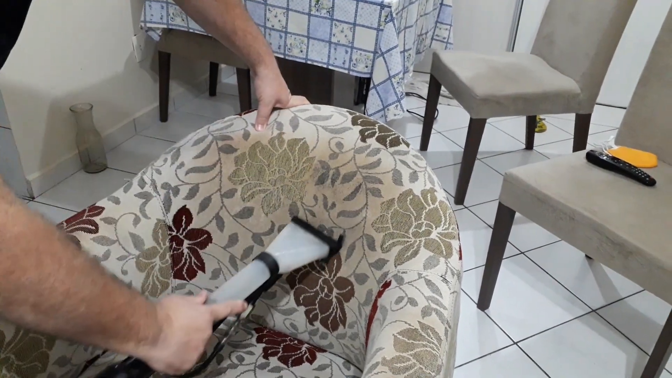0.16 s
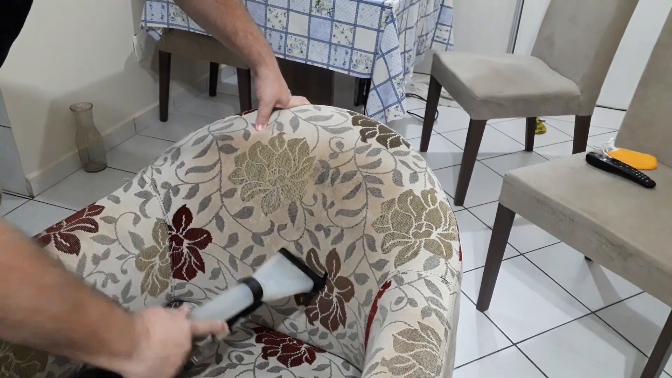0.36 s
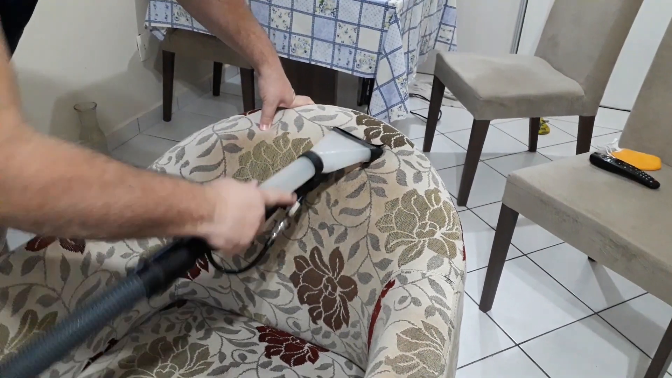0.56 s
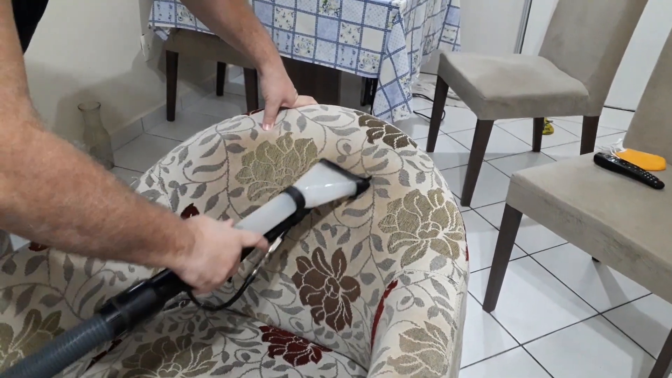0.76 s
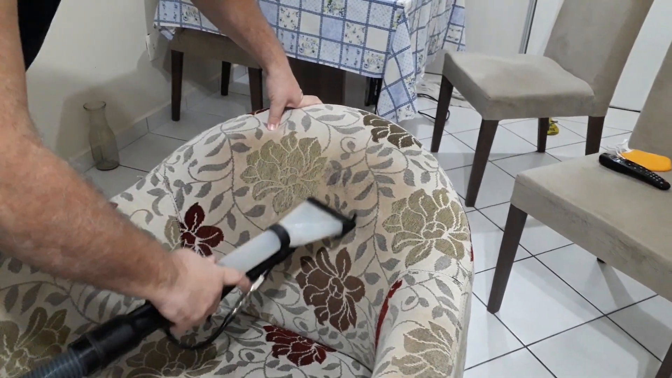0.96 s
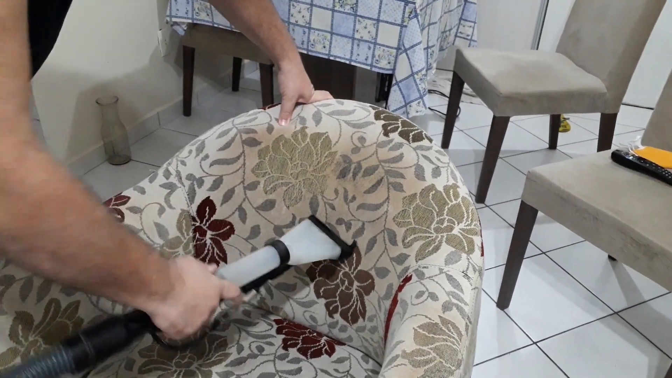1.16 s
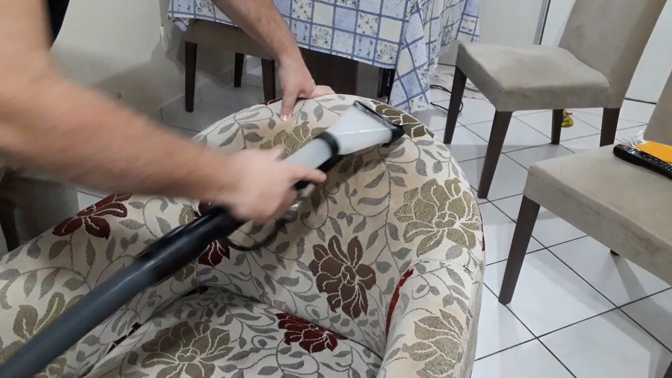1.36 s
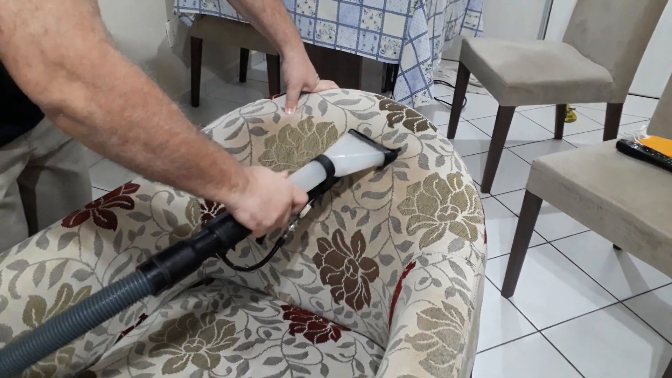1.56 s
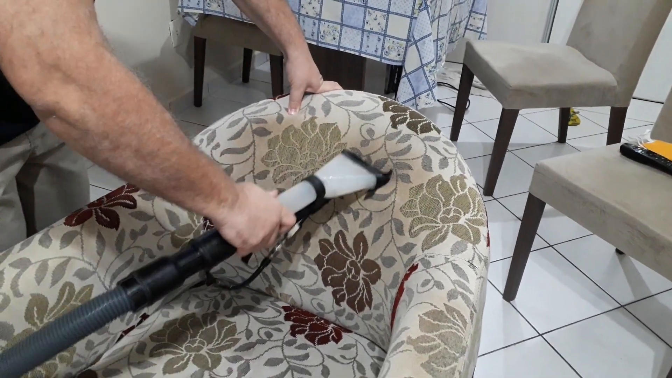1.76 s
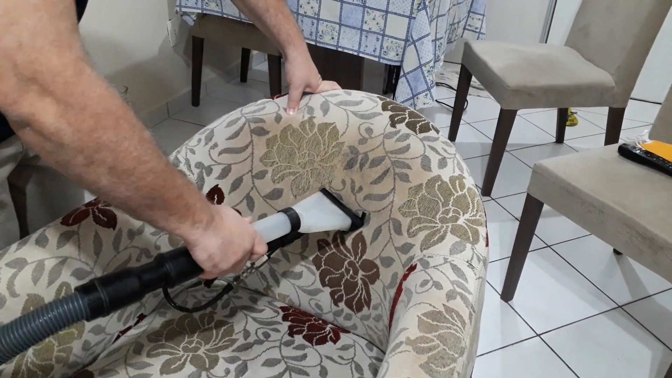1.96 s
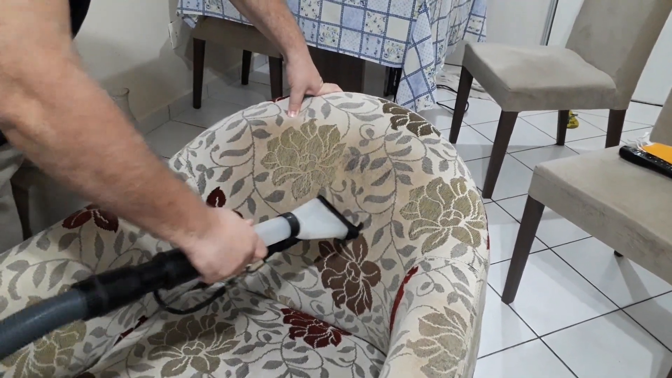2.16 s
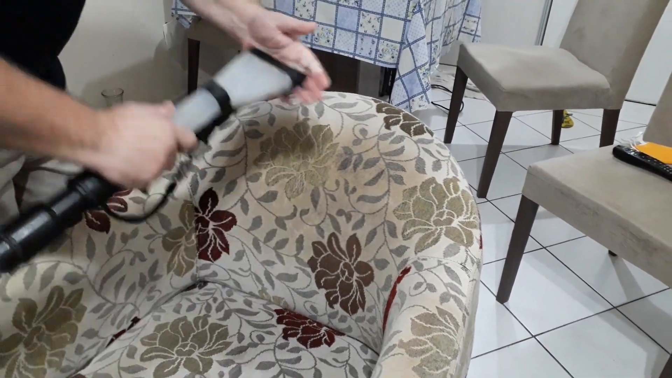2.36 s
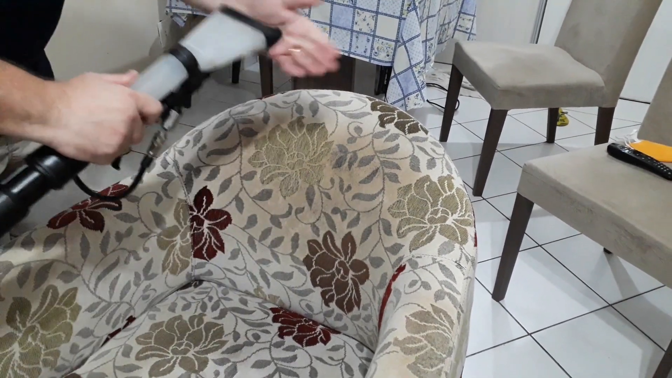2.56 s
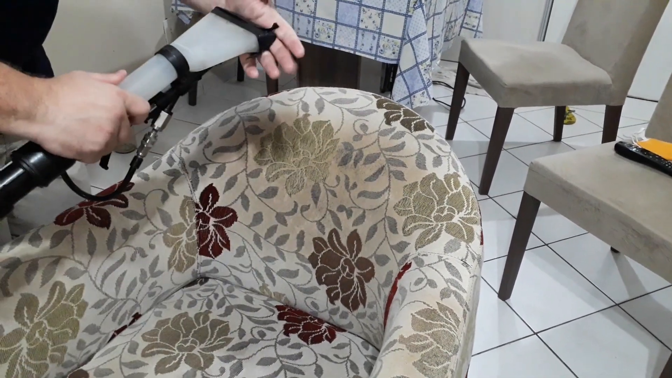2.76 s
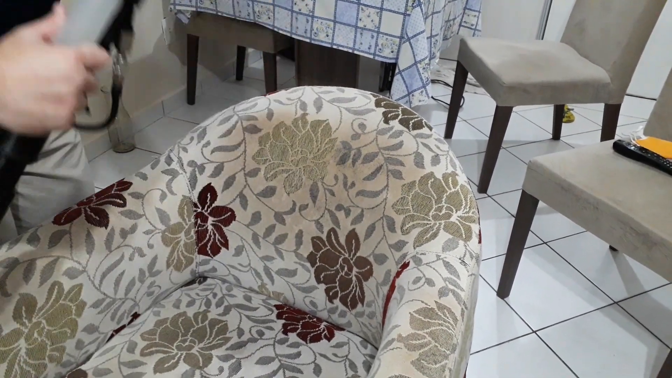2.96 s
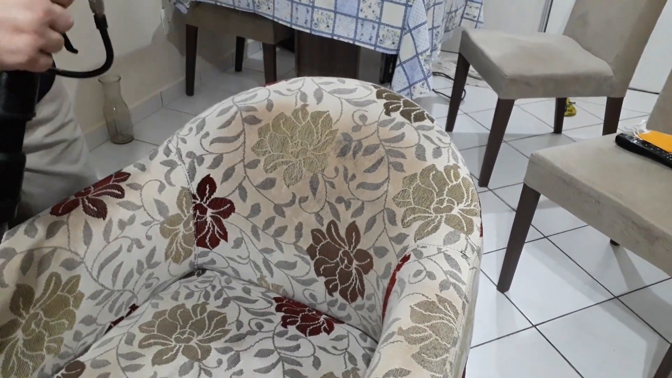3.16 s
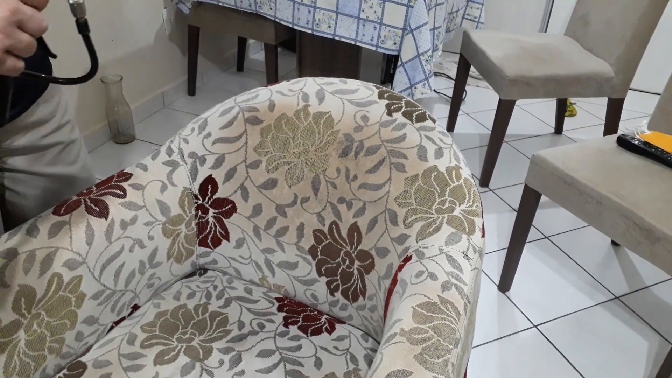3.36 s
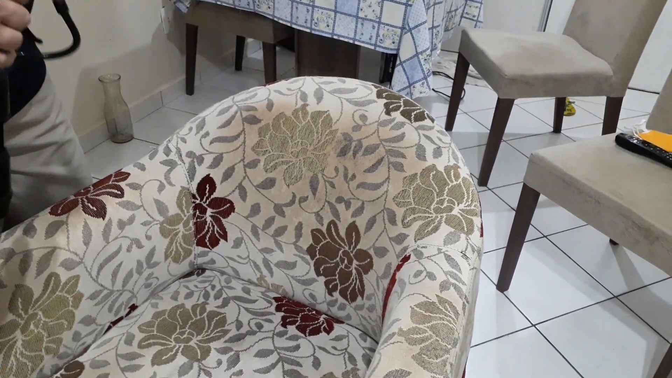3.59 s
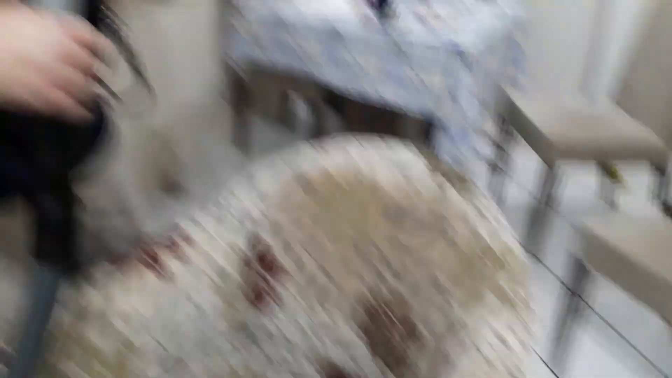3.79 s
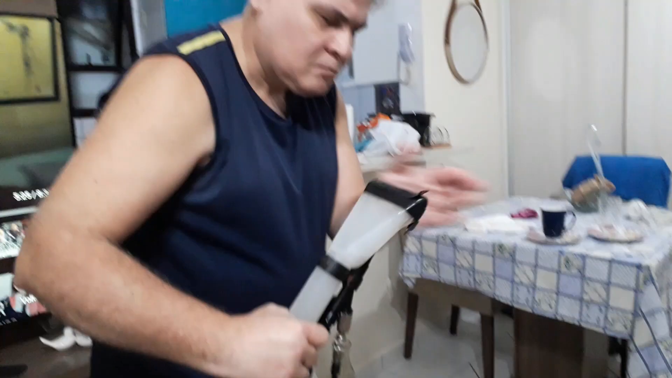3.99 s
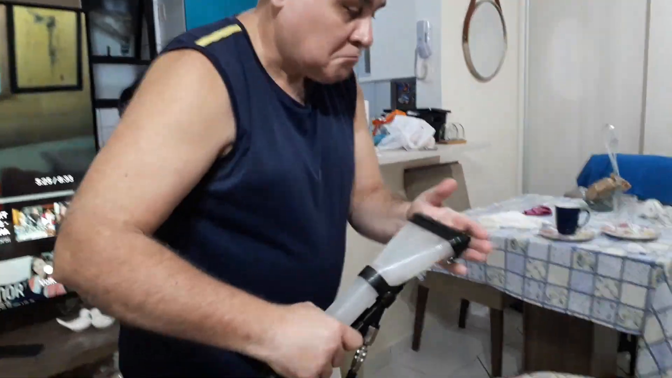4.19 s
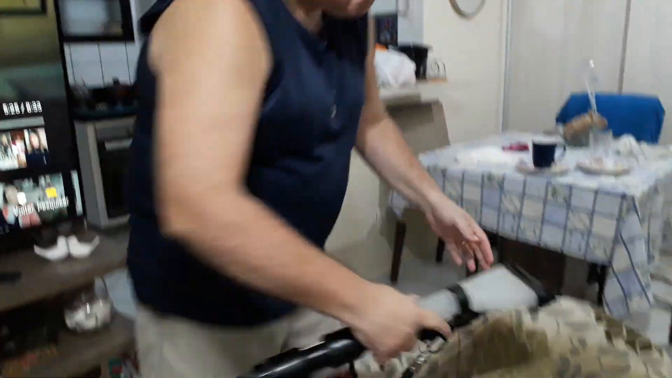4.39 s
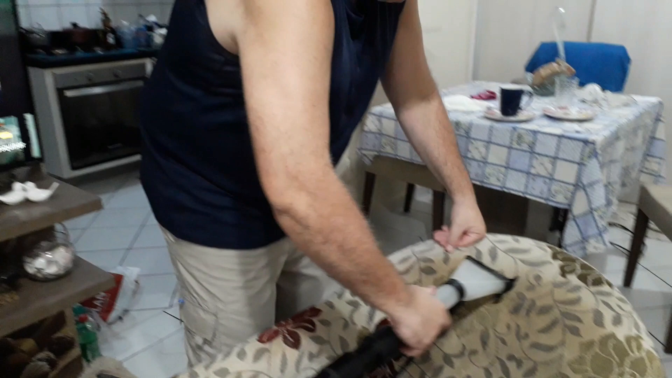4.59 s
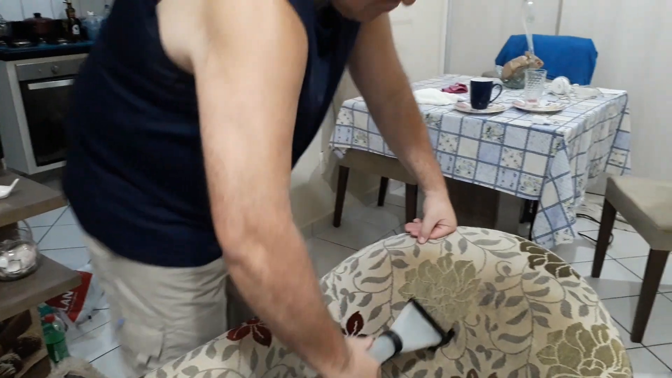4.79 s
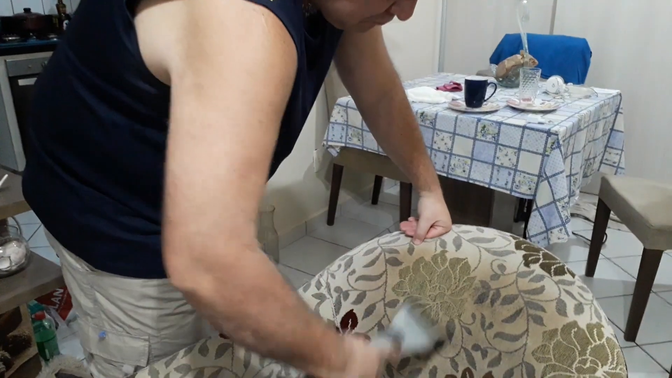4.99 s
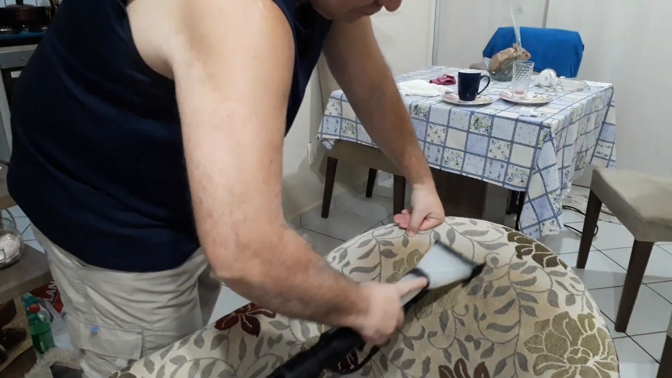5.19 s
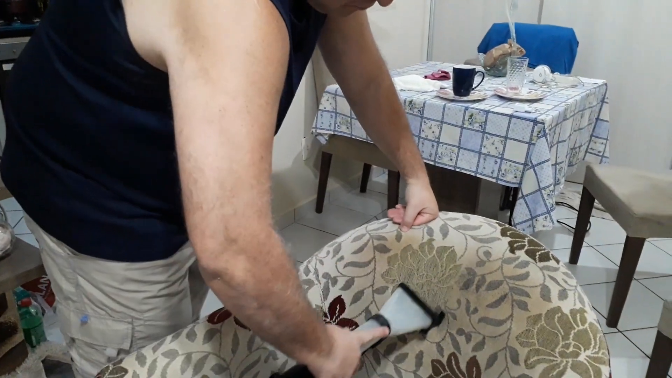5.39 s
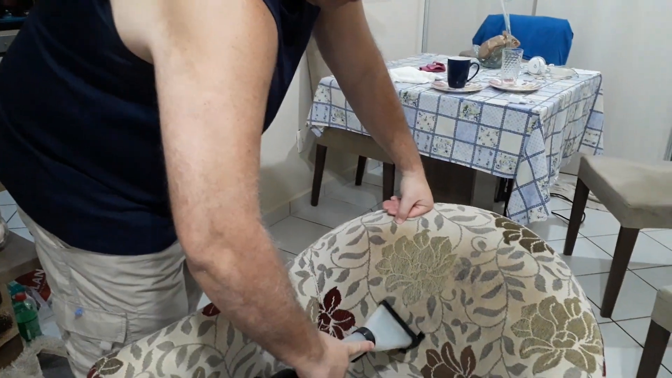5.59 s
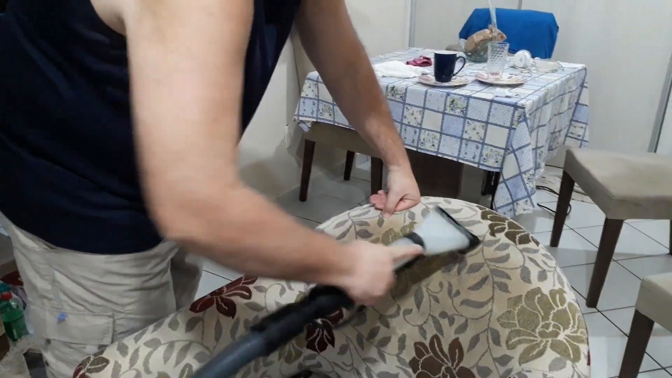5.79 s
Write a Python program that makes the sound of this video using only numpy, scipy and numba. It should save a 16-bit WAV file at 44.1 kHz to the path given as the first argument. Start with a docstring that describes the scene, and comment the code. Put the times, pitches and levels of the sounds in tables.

```python
"""Upholstery extractor on a damp armchair

A turbine, modelled as rotational orders of its shaft, speeds up whenever its air slot is choked.
Filtered noise makes the rush in the hose and the wet hiss and resonances at the slot.
Twice the nozzle is lifted and wiped with a hand: gliding noise bands squeal and slurp in the gap,
and once the palm pops off as decaying sines. Drops tick, cloth scuffs, and a tiled room prolongs the air.
All the air noise dips briefly 29 times a second."""
import sys
import numpy as np
from scipy import signal
from scipy.fft import rfft, irfft
from scipy.io import wavfile
from numba import njit

SR = 44100
rng = np.random.default_rng(int(sys.argv[2]) if len(sys.argv) > 2 else 0)


def log_audio(samples):
    """Write samples as a 16-bit WAV file to the path given in sys.argv[1]."""
    # one column per channel
    frames = np.atleast_2d(samples).T
    # limit to full scale, then quantise
    limited = np.clip(frames, -1, 1)
    pcm = np.round(limited * 32767).astype(np.int16)
    wavfile.write(sys.argv[1], SR, pcm)


N = 257544
T = np.arange(N) / SR  # s

# Slot covered by fabric, or the fourth and fifth time by the hand: start_s, end_s, gained_speed_hz,
# hiss_db, bite_db, whine_db, drone_db (all changes from the open slot)
SEALS = [(-.2, .41, 4.4, 4.5, 2.2, 1.5, 7.5), (0.598, 1.221, 7.9, 5, 3.5, 3, 6.5),
         (1.467, 2.24, 9.1, 3, 4, -2.5, 4), (2.381, 2.83, 6.8, 1, -0.5, -3, 1.5),
         (3.75, 4.2, 1.8, 0.5, 1.5, -2, 5), (4.6, 5.03, 7.66, 3, 3, 1.5, 10.5),
         (5.185, 5.71, 9.1, 4, 4.5, 1.5, 6.5)]
# Loudness course of the machine, scaled within each source: time_s, level_db
LOUDNESS = [(0, -0.44), (2.36, 0.45), (2.55, -2.8), (2.75, -10.5), (3.08, -9.2), (3.3, -5.5), (3.5, -0.0),
            (3.82, 1.6), (4.05, -2.5), (4.35, -6.5), (4.68, -7.5), (5.05, 0.0), (5.84, -0.76)]
# Spectral shape of air rushing in the hose: frequency_hz, relative_density_db (per Hz)
RUSH_SPECTRUM = [(25, -17), (60, -24), (110, -13), (147, -5), (190, -12), (270, -5.5), (350, 1),
                 (450, -3.5), (600, -4.5), (790, 2.5), (1400, -0.5), (2500, -1), (5000, -1), (16000, -26.5)]
# Spectral shape of hiss at the slot: frequency_hz, relative_density_db (per Hz)
HISS_SPECTRUM = [(800, -20), (2500, -17), (4500, -7.5), (6300, .5), (7600, 0.5), (9000, 0.5), (9850, 3),
                 (10900, -2), (12200, -1.5), (13600, -9), (16000, -6)]
# Air modes of the nozzle head: frequency_hz, nominal_width_hz, relative_level_db, extra_growth_db_per_db
NOZZLE_MODES = [(3320, 520, -0.5, -0.5), (3750, 370, -8, -1), (4090, 510, -2, -0.5), (4560, 400, -1, 1.2),
                (5950, 800, -10, 3.5)]
# Air squeezing between hand and slot: start_s, length_s, relative_level_db, swell_db, tight_hz, open_hz,
# nominal_breadth (share of the mean pitch)
SLURPS = [(2.36, 0.033, -21, 0, 7450, 8930, .8), (2.421, .033, -12.5, -.5, 6140, 6800, 0.18),
          (2.416, 0.092, -17, 0, 10350, 9900, .33), (2.511, 0.039, -13, 0.5, 10500, 3900, 0.35),
          (2.672, 0.14, -28, 5.5, 10300, 3570, 0.62), (3.875, 0.112, -14, 2, 10650, 3360, 0.43),
          (4.089, 0.026, -12, -1, 6510, 4200, 0.78), (4.174, 0.018, -17.5, 3, 5800, 6930, 1.5),
          (4.203, 0.015, -15, 3, 4870, 2990, 1.1)]
# Palm breaking the seal: start_s, amplitude_db (before decay), ring_hz, decay_s
POPS = [(2.537, -5.5, 412, 0.0018), (2.5402, -9, 120, 0.0056), (2.5405, -3.5, 990, 0.0016),
        (2.5411, -6, 1950, 0.0011)]
# Water drops striking the nozzle wall: start_s, peak_db, resonance_hz
DROPS = [(1.396, -16, 5000), (1.728, -11, 5500), (1.733, -10, 4520), (1.763, -11, 4940), (2.387, -2, 8000),
         (3.876, 1, 7000), (4.18, -9, 3470)]
# Nozzle scuffing the padding as it is set down: centre_s, level_db, half_length_s
SCUFFS = [(0.544, -31, .04), (1.408, -26, 0.019), (2.354, -35, 0.041), (5.112, -32.5, 0.036)]
# Spectral shape of rubbing cloth: frequency_hz, relative_density_db (per Hz)
SCUFF_SPECTRUM = [(30, -16), (80, -5), (150, 1), (300, 5), (800, 4), (1600, -3), (5000, -30)]

FREE_HZ, WANDER_HZ = 325.1, .35  # shaft speed with the slot open, and its unsteadiness
WHINE_DB, WHINE_DB_PER_HZ = -28.5, 0.8152  # at free speed; rise with the speed gained
HUM_DB, HUM_DB_PER_HZ = -50.5, 2.26
DRONE_DB = -37.8
SIXTH_DB, SIXTH_HUM_SHARE = -2.5, 0.62  # the sixth order follows the hum by this share, the drone by the rest
DUCT_HZ, DUCT_HALF_WIDTH_HZ, DUCT_DB = 3992, 3.1, 4  # resonance through which the whine passes
CHOKE_S, VENT_S = .36, .19  # the suction builds behind a seal and leaks away after it
SEAT_S, UNSEAT_S = .11, .28  # the lips of the slot seat and leave
RUSH_DB, RUSH_DB_PER_HZ = -20.5, -0.2531  # with the slot open; a choked hose carries less air
HISS_DB, SLOT_DB = -23.5, -27.6
SLOT_BRIGHT_DB = -25  # the upper slot modes take over above this level
BITE_AT, BITE_SPAN = .29, 0.32  # the nozzle bites hardest early (shares of the stroke)
HISS_AT, HISS_SPAN = 0.39, 0.44  # the wet hiss swells later and lasts longer (shares of the stroke)
GULP_AFTER_S, GULP_HALF_S, GULP_DB_PER_HZ = 0.079, 0.07, 0.2666  # per Hz of speed gained
GAP_OPENING = 7.5  # the gap holds tight and gives way late: power of the elapsed share
DIP_RATE_HZ = 29.25
TOP_HZ = 15800


def turbine(loud_db, gained_hz, seal_whine_db, seal_drone_db):
    """Rotational orders: twelve blades whine above the shaft hum and its fifth and sixth orders."""
    shaft_hz = FREE_HZ + gained_hz + WANDER_HZ * walk(7.8)
    blade_hz = 12 * shaft_hz
    duct_db = DUCT_DB / (1 + ((blade_hz - DUCT_HZ) / DUCT_HALF_WIDTH_HZ) ** 2)
    whine_db = WHINE_DB + .7 * loud_db + WHINE_DB_PER_HZ * gained_hz + seal_whine_db + duct_db
    hum_db = HUM_DB + 0.98 * loud_db + HUM_DB_PER_HZ * gained_hz
    drone_db = DRONE_DB + 0.84 * loud_db + seal_drone_db
    sixth_db = SIXTH_DB + drone_db + SIXTH_HUM_SHARE * (hum_db - drone_db)

    turn = 2 * np.pi * np.cumsum(shaft_hz) / SR
    whine = undb(whine_db) * tone(12 * turn, rough=0.045, width_hz=28)
    # a wholly shaken copy widens the line into a noisy skirt
    skirt = undb(whine_db - 14.0) * tone(12 * turn, rough=1.0, width_hz=150)
    hum = undb(hum_db) * tone(turn, rough=0.14, width_hz=69)
    drone = undb(drone_db) * tone(5 * turn, rough=0.07, width_hz=43)
    sixth = undb(sixth_db) * tone(6 * turn, rough=0.18, width_hz=20)
    # the casing booms near the shaft speed, along with the drone
    casing = unit(bandpass(rng.standard_normal(N), np.full(N, 360.), 62.0))
    boom = casing * undb(0.7 * drone_db - 16)
    return whine + skirt + hum + drone + sixth + boom


def suction():
    """Flow restriction: a choked turbine gains speed and alters its whine; seated lips add drone."""
    gained_hz = whine_db = drone_db = 0
    for start, end, hz, _, _, whine, drone in SEALS:
        choke = grip(start, end, CHOKE_S, VENT_S)
        gained_hz = gained_hz + hz * choke
        whine_db = whine_db + whine * choke
        drone_db = drone_db + drone * grip(start, end, SEAT_S, UNSEAT_S)
    return gained_hz, whine_db, drone_db


def tone(phase, rough, width_hz):
    """Turbulent modulation: a line of rms 1, shaken in level and phase; rough is the shaken share."""
    rough = np.clip(rough, 0, 1)
    steady = np.sqrt(2 * (1 - rough))
    shake = np.sqrt(rough) * (walk(width_hz) + 1j * walk(width_hz))
    return np.real((steady + shake) * np.exp(1j * phase))


def airflow(loud_db, gained_hz):
    """Turbulent flow noise: air roars in the hose, hisses with spray and excites the slot modes."""
    bite_db, wet_db, gulp_db = contact()
    rush_db = RUSH_DB + loud_db + RUSH_DB_PER_HZ * gained_hz + gulp_db
    hiss_db = HISS_DB + 1.02 * loud_db + wet_db
    slot_db = SLOT_DB + 0.68 * loud_db + bite_db
    rush = colour(rng.standard_normal(N), RUSH_SPECTRUM) * undb(rush_db + .5 * walk(14))
    wet_noise = rng.standard_normal(N) + undb(-9.5) * spray(per_s=2800, spread_db=3.5)
    hiss = colour(wet_noise, HISS_SPECTRUM) * undb(hiss_db)
    ring = 0
    for hz, width_hz, db, growth in NOZZLE_MODES:
        # the seal keeps shifting, so each mode wanders a little
        centre_hz = hz * (1 + 0.025 * walk(7.9))
        jet = rng.standard_normal(N) + undb(-9) * spray(per_s=610, spread_db=3.0)
        mode = resonate(jet, centre_hz, 1.6 * width_hz)
        mode_db = slot_db + db + (0.97 + growth) * (slot_db - SLOT_BRIGHT_DB)
        ring = ring + mode * undb(mode_db)
    return rush + (hiss + ring) * undb(0.31 * walk(30))


def contact():
    """Varying aperture: in each stroke the slot bites, wet hiss swells, and air gulps in at release."""
    bite_db = wet_db = gulp_db = 0
    for start, end, hz, hiss, bite, _, _ in SEALS:
        share = (T - start) / (end - start)
        bite_db = bite_db + bite * bell((share - BITE_AT) / BITE_SPAN)
        wet_db = wet_db + hiss * bell((share - HISS_AT) / HISS_SPAN)
        gulp_db = gulp_db + GULP_DB_PER_HZ * hz * bell((T - end - GULP_AFTER_S) / GULP_HALF_S)
    return bite_db, wet_db, gulp_db


def spray(per_s, spread_db):
    """Random impulses: droplets torn from the fabric click densely, a few much larger than the rest."""
    hit = rng.random(N) < per_s / SR
    size = undb(spread_db * np.minimum(rng.exponential(size=N), 4))
    return unit(hit * size * rng.choice([-1, 1], N))


def slurps(edge_s, release_s, rough_db, leak_db, head_hz, head_width_hz, head_db):
    """Jet resonance: the gap under the hand sings a gliding band, amid leaking hiss and a ringing head."""
    out = np.zeros(N)
    ragged = undb(rough_db * walk(400))
    head = resonate(rng.standard_normal(N), np.full(N, 1. * head_hz), 1. * head_width_hz)
    leak = colour(rng.standard_normal(N), HISS_SPECTRUM)
    around = undb(leak_db) * leak + undb(head_db) * head
    for s, length, db, swell_db, tight_hz, open_hz, breadth in SLURPS:
        t = T[:int((length + .06) * SR)]
        here = int(s * SR) + np.arange(len(t))
        share = np.minimum(t / length, 1)
        glide_hz = tight_hz * (open_hz / tight_hz) ** (share ** GAP_OPENING)
        pitch_hz = np.minimum(glide_hz, SR / 3)
        width_hz = 1.8 * breadth * np.sqrt(tight_hz * open_hz)
        jet = rng.standard_normal(SR // 2)[:len(t)]
        sung = resonate(jet, pitch_hz, width_hz)
        gate = (1 - np.exp(-t / edge_s)) * np.exp(-np.maximum(t - length, 0) / release_s)
        add(out, s, undb(db + swell_db * share) * gate * ragged[here] * (sung + around[here]))
    return out


def knocks():
    """Impulse response: drops tick on the plastic; the palm releases a damped pop of the air column."""
    out, t = np.zeros(N), T[:SR // 20]
    for s, db, hz in DROPS:
        strike = rng.standard_normal(len(t)) * np.exp(-t / 0.00049)
        tick = bandpass(strike, np.full(len(t), 1. * hz), 6000.)
        add(out, s, undb(db) * tick / np.abs(tick).max())
    for s, db, hz, decay_s in POPS:
        add(out, s, undb(db) * np.sin(2 * np.pi * hz * t) * np.exp(-t / decay_s))
    return out


def scuffs():
    """Friction noise: rubbing cloth gives dull swells."""
    press = sum(undb(db) * bell((T - s) / half_s) for s, db, half_s in SCUFFS)
    return press * colour(rng.standard_normal(N), SCUFF_SPECTRUM)


def periodic_dips(depth_db, width, offset):
    """Amplitude modulation: a brief dip once a period; width and offset are shares of the period."""
    place = (DIP_RATE_HZ * T + offset + .5) % 1 - .5
    return undb(-depth_db * bell(place / width))


def room(x, t60, wet_db):
    """Diffuse reverberation: tiles and walls return a short, exponentially decaying noise tail."""
    t = T[:SR // 2]
    tail = rng.standard_normal(len(t)) * np.exp(-np.log(1000) * t / t60) * (t > .004)
    return x + undb(wet_db) * signal.fftconvolve(x, tail / np.linalg.norm(tail))[:N]


@njit
def bandpass(x, hz, width):
    """Second-order resonance: a state-variable filter whose centre moves every sample."""
    y, band, low = np.empty(len(x)), 0., 0.
    for i in range(len(x)):
        g, k = np.tan(np.pi * hz[i] / SR), width / hz[i]
        v = (band + g * (x[i] - low)) / (1 + g * (g + k))
        band, low, y[i] = 2 * v - band, low + 2 * g * v, k * v
    return y


def resonate(x, hz, width_hz):
    """Cascaded resonance: two equal band-passes steepen the skirts; scaled to rms 1."""
    return unit(bandpass(bandpass(x, hz, width_hz), hz, width_hz))


def colour(x, spectrum):
    """Spectral shaping: weight by (Hz, dB) points joined over log frequency; scaled to rms 1."""
    hz, db = np.transpose(spectrum)
    bins = np.maximum(np.arange(N // 2 + 1) * SR / N, 1)
    gain = undb(np.interp(np.log(bins), np.log(hz), db))
    return unit(irfft(rfft(x) * gain, N))


def walk(rate_hz):
    """Low-pass noise: smooth random motion up to about rate_hz, of rms 1."""
    bins = np.arange(N // 2 + 1) * SR / N
    return unit(irfft(rfft(rng.standard_normal(N)) / (1 + (bins / rate_hz) ** 2) ** 2, N))


def grip(start, end, rise_s, fall_s):
    """Exponential relaxation: rises to 1 from start to end, ever more slowly, then dies away."""
    elapsed = np.clip(T - start, 0, end - start)
    risen = (1 - np.exp(-elapsed / rise_s)) / (1 - np.exp(-(end - start) / rise_s))
    return risen * np.exp(-np.maximum(T - end, 0) / fall_s)


def bell(x):
    """Gaussian envelope: a smooth hump of height 1 around zero."""
    return np.exp(-x ** 2)


def curve(table):
    """Linear interpolation: a timed table as one value per sample."""
    return np.interp(T, *np.transpose(table))


def undb(db):
    """Logarithmic level: decibels to amplitude gain."""
    return 10 ** (np.asarray(db) / 20)


def unit(x):
    """Power normalization: scale to rms 1."""
    return x / np.sqrt(np.mean(x ** 2))


def add(out, s, x):
    """Superposition: mix x in at time s."""
    i = int(s * SR)
    out[i:i + len(x)] += x[:N - i]


def scene():
    """Superposition: direct machine and knocks join the reverberant, dipping air; both ears alike."""
    loud_db = curve(LOUDNESS)
    gained_hz, whine_db, drone_db = suction()
    wipes = slurps(edge_s=.003, release_s=0.016, rough_db=0.2, leak_db=-3.0,
                   head_hz=3970, head_width_hz=3100, head_db=-5.5)
    air = airflow(loud_db, gained_hz) + scuffs() + undb(-2.0) * wipes
    heard_air = room(air, t60=0.34, wet_db=-15.0) * periodic_dips(depth_db=2.5, width=0.087, offset=0.028)
    mono = turbine(loud_db, gained_hz, whine_db, drone_db) + knocks() + heard_air
    return np.array([mono, mono])


def record(dry):
    """Band limiting: the microphone thins deep bass; the recorder clips at full scale and cuts the top."""
    thin = signal.sosfilt(signal.butter(2, 55, "high", fs=SR, output="sos"), dry)
    clipped = np.clip(thin, -1, 1)
    return signal.sosfilt(signal.ellip(12, .2, 80, TOP_HZ, fs=SR, output="sos"), clipped)


dry = scene()
out = record(dry)
log_audio(out)
```